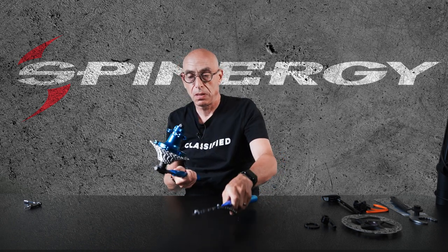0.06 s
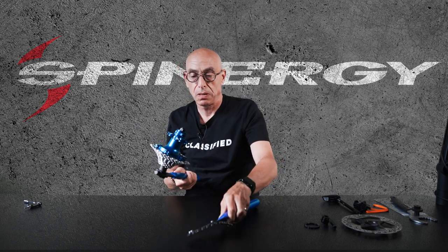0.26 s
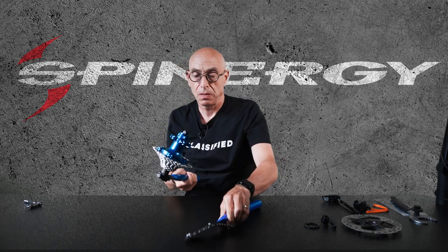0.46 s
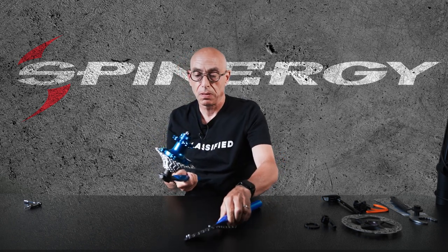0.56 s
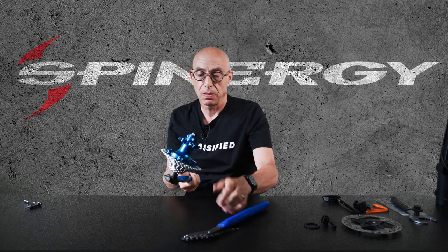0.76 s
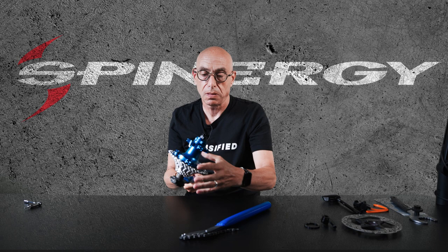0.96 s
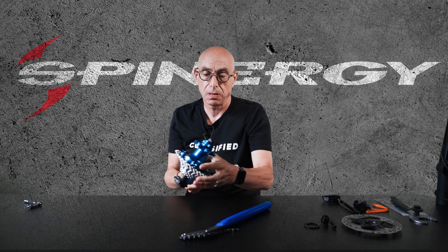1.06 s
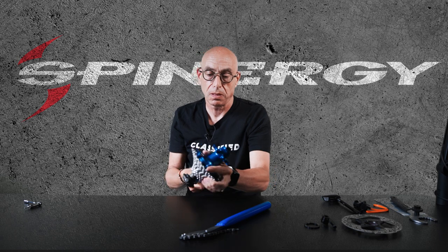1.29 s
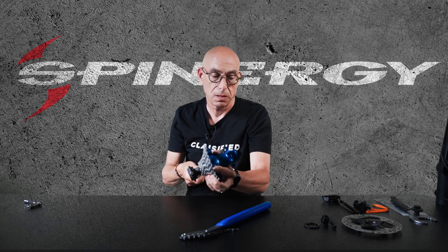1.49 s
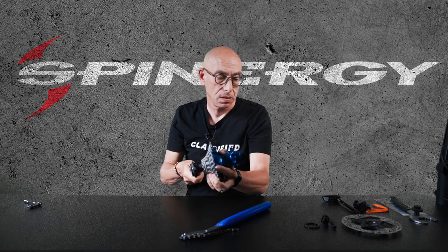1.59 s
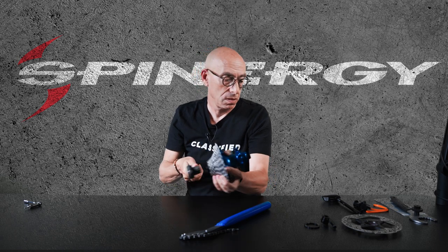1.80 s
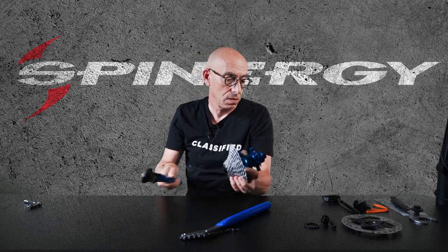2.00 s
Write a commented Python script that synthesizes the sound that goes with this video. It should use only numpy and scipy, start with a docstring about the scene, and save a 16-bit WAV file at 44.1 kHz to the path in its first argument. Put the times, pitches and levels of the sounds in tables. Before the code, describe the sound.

A steel bicycle tool with a chain bumps twice on a workbench, then drops and rocks to rest, rattling. Closer to the microphone, a wrench clinks against sprockets and knocks free. The small room rings briefly.

```python
"""A workbench in a small room, heard through one microphone. A chain whip is laid down: its
handle bumps twice, then the steel bar drops and rocks to rest, thudding in the bench top and
ringing while its chain rattles and ticks. Nearer the microphone, and so drier, a hand-held
lockring wrench clinks against a bicycle cassette, slides in the splines and knocks free.
The room rings briefly after each blow, over faint steady air."""
import sys
import numpy as np
from scipy import signal
from scipy.fft import rfft, irfft
from scipy.io import wavfile

SR = 44100
rng = np.random.default_rng(int(sys.argv[2]) if len(sys.argv) > 2 else 0)


def int16_out(signal):
    """Quantize to a 16-bit WAV file."""
    q = np.round(np.clip(np.atleast_2d(signal).T, -1, 1) * 32767)
    wavfile.write(sys.argv[1], SR, q.astype(np.int16))


N = 90404
T = np.arange(N) / SR

# the whip lands on the bench; each spot favours one pitch:
# t/s, thud level/dB, contact cut-off/Hz, bar level/dB, favoured f/Hz, its boost/dB
WHIP_KNOCKS = [(0.2143, -9, 794, -28.5, 409, 4.5), (0.3949, -12, 770, -27, 360, 3.5),
               (0.5276, -1, 3000, -0.5, 900, 3.5), (0.665, -3.5, 1020, -15.5, 860, 6),
               (.6948, -6, 1210, -14, 680, 0), (0.7178, -7, 513, -24, 566, 5),
               (.767, -12.5, 2620, -6.5, 190, 6.5), (.782, -12, 1960, -12, 200, 2.5),
               (.862, -16, 1100, -48.5, 700, -2), (.922, -27, 800, -47, 543, 4.5)]
# the jolted chain rattles: t/s, length/s, level/dB
CHAIN_RATTLES = [(0.214, 0.029, -55), (.396, 0.041, -51.5), (0.661, 0.051, -37), (0.762, 0.039, -45.5)]
# colour of the rattling links: f/Hz, relative level/dB
CHAIN_SPECTRUM = [(1000, -6), (2500, 11.5), (4500, -1.5), (7000, -5), (9500, -12.5), (12000, -23),
                  (16000, -32.5)]
# single links ring: t/s, level/dB, f/Hz
LINK_RINGS = [(0.218, -39, 3960), (.2245, -44.5, 6880), (.236, -40.5, 4050), (.415, -45, 3900),
              (.533, -47, 10050), (.54, -41.5, 11300), (.6942, -19.5, 4580), (.895, -43, 4020)]
# dry ticks of loose steel: t/s, level/dB, centre f/Hz
STEEL_TICKS = [(0.2983, -32.5, 1850), (0.476, -33.5, 2110), (.5279, -18, 4780), (0.651, -20, 3020),
               (0.68, -45, 5044), (0.6933, -31.5, 6200), (.763, -44, 6000), (.7672, -17.5, 2900),
               (0.7711, -29.5, 5500), (0.783, -24, 2760), (.813, -38.5, 4800), (1.0073, -55, 4460),
               (1.289, -52.5, 3500), (1.376, -50.5, 1574), (1.504, -55, 4920), (1.54, -48.5, 4510),
               (1.6302, -43.5, 7910), (1.739, -36.5, 2200)]
# the wrench touches the cassette, and later knocks free: t/s, level/dB
CASSETTE_CLINKS = [(1.1668, -3.5), (1.1703, -3), (1.1733, -8.5), (1.236, -19), (1.243, -24)]
RELEASE_KNOCKS = [(1.8053, -10), (1.8079, 2), (1.812, -4.5)]
# modes of each struck body: f/Hz, level/dB, t60/s
BENCH_MODES = [(126.9, -31, 0.24), (172.3, -18, .08), (259, -22.5, 0.11), (282, -23.5, 0.13),
               (337, -17.5, .045), (440, -23.5, .035), (561, -8.5, .045), (643, -13.5, 0.12),
               (842.2, -7.5, .05), (1017.6, -15.5, 0.046), (1250, -12.5, 0.056)]
BAR_MODES = [(1482, -16.5, 0.031), (1574, -9.5, 0.066), (1671, -9.5, .035), (2056, -9, .035),
             (2185, -7.5, 0.022), (2530, -14.5, .03), (2750, -27.5, 0.0067), (3230, -21, .025),
             (4180, -40, 0.034)]
CASSETTE_MODES = [(2145, -44.5, 0.018), (2647, -49.5, 0.072), (3214, -54, 0.13), (4100, -47, 0.042),
                  (5300, -53, 0.15), (5179, -52, 0.038), (6040, -51, 0.085), (7671, -49, 0.058),
                  (9040, -61, 0.053), (10010, -47, 0.027), (10460, -46, .03), (12300, -65, .04)]
WRENCH_MODES = [(711, -45, .11), (1109, -43, .1), (2000, -38, .02), (2600, -40, .02), (3655, -45, .055),
                (4759, -47, .04), (6051, -34, .016), (6724, -43, .02), (7031, -39, .025), (7467, -41, .02),
                (8200, -39, .015), (14370, -59, .04)]
# the crack, a crowd of brief modes under each ring: f/Hz, relative level/dB
BENCH_CRACK_SPECTRUM = [(40, -10.5), (100, -8), (350, -2), (900, -4), (2400, -4.5), (3500, -19.5),
                        (7000, -24), (16000, -37)]
BAR_CRACK_SPECTRUM = [(500, -9.5), (1500, 7.5), (2400, 8.5), (3300, -4.5), (6500, -34.5), (9000, -38.5),
                      (16000, -43)]
CASSETTE_CRACK_SPECTRUM = [(800, -16.5), (2200, 0.5), (5000, 3.5), (10000, -7.5), (16000, -26)]
WRENCH_CRACK_SPECTRUM = [(200, -6.5), (700, 9), (3000, -5), (7000, 9.5), (9500, -25.5), (16000, -23)]
# decay of the room's tail: f/Hz, t60/s
TAIL_T60 = [(100, 1.3), (250, 0.1151), (700, 0.4144), (2000, 0.2228), (5000, 0.29), (14000, 0.5)]
# colour of that tail: f/Hz, level/dB
TAIL_SPECTRUM = [(60, -20.5), (160, -8.5), (300, 4), (700, -8.5), (2000, -6), (5000, -7), (14000, -9)]
# standing waves of the room: f/Hz, level/dB, t60/s
STANDING_WAVES = [(128, -0.5, .6), (146, 3, .55), (181, 9.5, 0.51), (203, -3.5, 1.4), (238, 2, 0.66),
                  (335, -5, 0.5), (542.6, 0, 0.27), (588.6, -3.5, 0.32), (665, -2.5, .35),
                  (842, -3.5, 0.18)]
# room tone of still air: f/Hz, relative level/dB
AIR_SPECTRUM = [(15, -30.5), (25, -6), (50, -2), (88, -4.5), (112, -16.5), (160, -18.5), (195, -13),
                (305, -16.5), (450, -17), (780, -20.5), (1170, -24), (3000, -32), (7000, -37), (15500, -40)]


def from_db(db):
    """Decibels to gain."""
    return 10 ** (np.asarray(db) / 20)


def at_hz(points, hz):
    """Reads a table on a log-frequency axis."""
    f, value = np.transpose(points)
    return np.interp(np.log(np.maximum(hz, 1)), np.log(f), value)


def noise(spectrum):
    """Coloured noise of rms 1."""
    colour = from_db(at_hz(spectrum, np.fft.rfftfreq(N, 1 / SR)))
    x = irfft(rfft(rng.standard_normal(N)) * colour, N)
    return x / x.std()


def dying(t60):
    """An envelope that loses 60 dB in t60 seconds."""
    return np.exp(-np.minimum(np.log(1000) * T / t60, 60))


def later(x, s):
    """The sound x, starting at s seconds."""
    return np.concatenate([np.zeros(int(s * SR)), x])[:N]


def filtered(x, hz, kind):
    """A second-order Butterworth filter."""
    return signal.sosfilt(signal.butter(2, hz, kind, fs=SR, output="sos"), x + 1e-18)


def rms_one(x, length):
    """Scales a burst to the energy of rms 1 held for length seconds."""
    return x / np.sqrt(np.sum(x ** 2) / (length * SR) + 1e-18)


def strike(modes, crack, crack_db, crack_t60, spread_db=1.5):
    """One blow: every mode rings with a strength of its own over a short crack."""
    scatter_db = rng.normal(0, spread_db, len(modes))
    ring = sum((-1) ** k * from_db(db + scatter_db[k]) * np.sin(2 * np.pi * hz * T) * dying(t60)
               for k, (hz, db, t60) in enumerate(modes))
    return ring + from_db(crack_db) * noise(crack) * dying(crack_t60)


def whip_on_bench(spot_q=4.6, bar_top_hz=4470, bench_low_hz=118):
    """Each knock thuds in the bench top, duller where the grip lands, and rings the steel bar."""
    out = np.zeros(N)
    for s, thud_db, contact_hz, bar_db, spot_hz, spot_db in WHIP_KNOCKS:
        thud = strike(BENCH_MODES, BENCH_CRACK_SPECTRUM, crack_db=-5.5, crack_t60=0.082)
        thud = filtered(thud, contact_hz, "low")
        favoured = signal.lfilter(*signal.iirpeak(spot_hz, spot_q, fs=SR), thud)
        thud += (from_db(spot_db) - 1) * favoured
        bar = strike(BAR_MODES, BAR_CRACK_SPECTRUM, crack_db=-17.5, crack_t60=0.047)
        bar = filtered(bar, bar_top_hz, "low")  # the bench surface softens the ring
        out += later(from_db(thud_db) * thud + from_db(bar_db) * bar, s)
    # the bench top radiates little bass
    return signal.lfilter(*signal.butter(1, bench_low_hz, "high", fs=SR), out)


def chain_rattle(contacts_per_s=2300):
    """Dense tiny contacts between the links whenever the chain is jolted."""
    out = np.zeros(N)
    for s, length, db in CHAIN_RATTLES:
        contacts = (rng.random(N) < contacts_per_s / SR) * rng.standard_normal(N) * (T < length)
        link_click = noise(CHAIN_SPECTRUM) * dying(t60=0.015)
        rattle = signal.fftconvolve(contacts, link_click)[:N]
        out += later(from_db(db) * rms_one(rattle, length), s)
    return out


def loose_steel(band_ratio=1.27, link_spread_hz=130):
    """Chain links and sprockets tick; now and then a link rings briefly on four close modes."""
    out = np.zeros(N)
    for s, db, hz in STEEL_TICKS:
        burst = rng.standard_normal(N) * dying(t60=0.0074)
        tick = filtered(burst, [hz / band_ratio, hz * band_ratio], "band")
        out += later(from_db(db) * tick / np.abs(tick).max(), s)
    for s, db, hz in LINK_RINGS:
        modes_hz = hz + link_spread_hz * rng.normal(size=(4, 1))
        ring = np.sin(2 * np.pi * modes_hz * T).mean(axis=0)
        out += later(from_db(db) * ring * dying(t60=0.02), s)
    return out


def cassette_clinks(gain_db=1):
    """The wrench touches the sprockets, which ring light and bright."""
    out = np.zeros(N)
    for s, db in CASSETTE_CLINKS:
        clink = strike(CASSETTE_MODES, CASSETTE_CRACK_SPECTRUM, crack_db=-38, crack_t60=0.037)
        out += later(from_db(gain_db + db) * clink, s)
    return out


def wrench_slide(start_s=1.783, length_s=0.024, catches_per_s=2000, swell_db_per_s=110, level_db=-50):
    """The wrench scrapes along the splines in tiny catches, ever harder."""
    catches = (rng.random(N) < catches_per_s / SR) * rng.choice([-1, 1], N) * (T < length_s)
    swell = from_db(swell_db_per_s * np.minimum(T, length_s))
    ring = strike(WRENCH_MODES, WRENCH_CRACK_SPECTRUM, crack_db=-31, crack_t60=0.013)
    scrape = signal.fftconvolve(catches * swell, ring)[:N]
    scrape = filtered(scrape, hz=6030, kind="low")  # duller than the knock that follows
    return from_db(level_db) * later(rms_one(scrape, length_s), start_s)


def wrench_release():
    """The wrench comes free in three quick knocks that ring its steel."""
    out = np.zeros(N)
    for s, db in RELEASE_KNOCKS:
        knock = strike(WRENCH_MODES, WRENCH_CRACK_SPECTRUM, crack_db=-31.5, crack_t60=0.017)
        out += later(from_db(db) * knock, s)
    return out


def room(x, echo_s=0.0045, echo_db=-16.5, gap_s=0.0054, build_s=0.0022):
    """One close reflection, a diffuse tail in which the lows last longest, and standing waves."""
    hz = np.fft.rfftfreq(N, 1 / SR)
    white = rfft(rng.standard_normal(N))
    build_up = 1 - np.exp(-T / build_s)
    edges_hz = np.geomspace(40, 18000, 22)
    tail = np.zeros(N)
    for low, high in zip(edges_hz, edges_hz[1:]):
        centre = np.sqrt(low * high)
        band = irfft(white * ((hz >= low) & (hz < high)), N)
        band *= dying(at_hz(TAIL_T60, centre)) * build_up
        band *= np.sqrt(2 * (high - low) / SR / np.sum(band ** 2))  # unit gain within the band
        tail += from_db(at_hz(TAIL_SPECTRUM, centre)) * band
    for mode_hz, db, t60 in STANDING_WAVES:
        decay = dying(t60)
        tail += from_db(db) * 2 * np.cos(2 * np.pi * mode_hz * T) * decay / decay.sum()
    reflection = from_db(echo_db) * later(x, echo_s)
    return reflection + later(signal.fftconvolve(x, tail)[:N], gap_s)


def scene(held_room_db=-3.5, air_db=-56):
    """At the microphone: the tools, their room and its faint steady air."""
    on_bench = whip_on_bench() + chain_rattle() + loose_steel()
    held = cassette_clinks() + wrench_slide() + wrench_release()
    # tools in the hands are nearer the microphone, so drier
    reverb = room(on_bench + from_db(held_room_db) * held)
    room_tone = from_db(air_db) * noise(AIR_SPECTRUM)
    return (on_bench + held + reverb + room_tone)[None]


def record(dry):
    """The hardest knock overloads; the top is cut above 16 kHz."""
    top_cut = signal.ellip(10, 0.1, 80, 16000, fs=SR, output="sos")
    return signal.sosfilt(top_cut, np.clip(dry, -1, 1))


dry = scene()
out = record(dry)
int16_out(out)
```